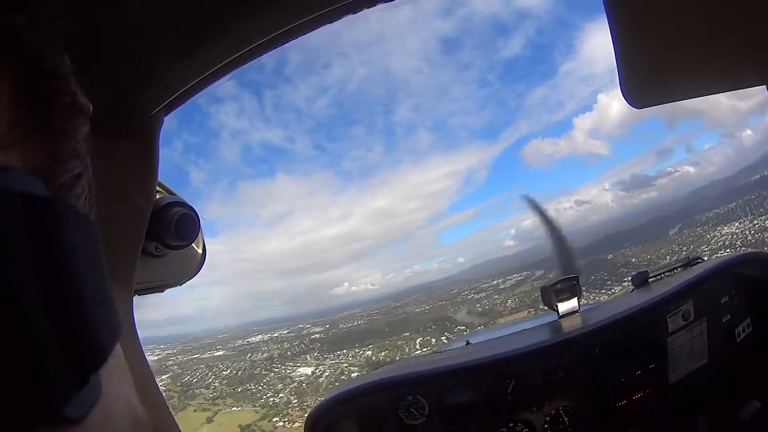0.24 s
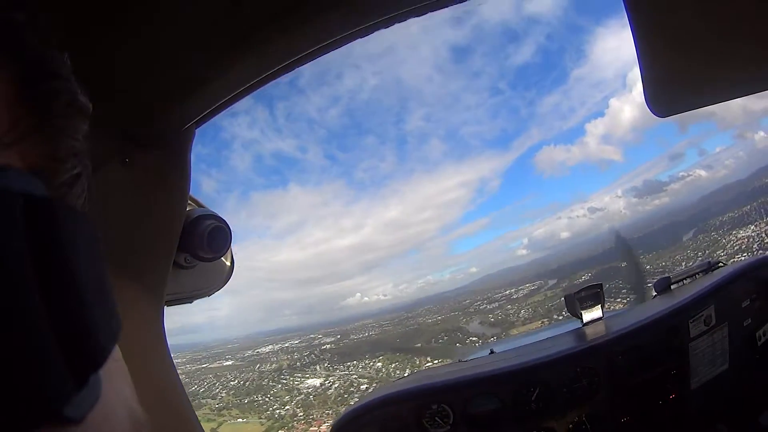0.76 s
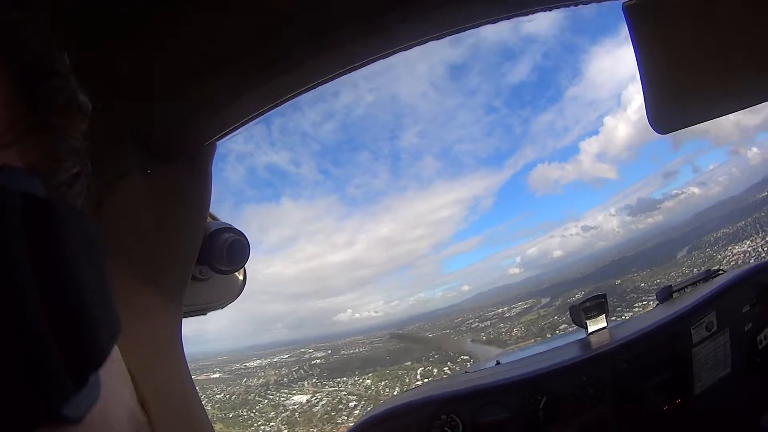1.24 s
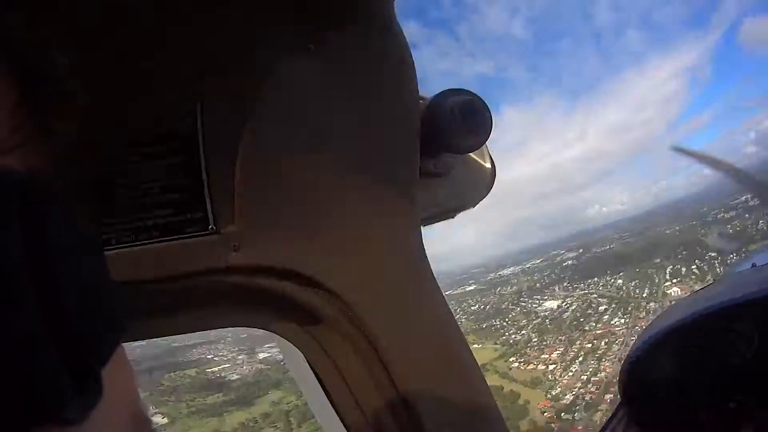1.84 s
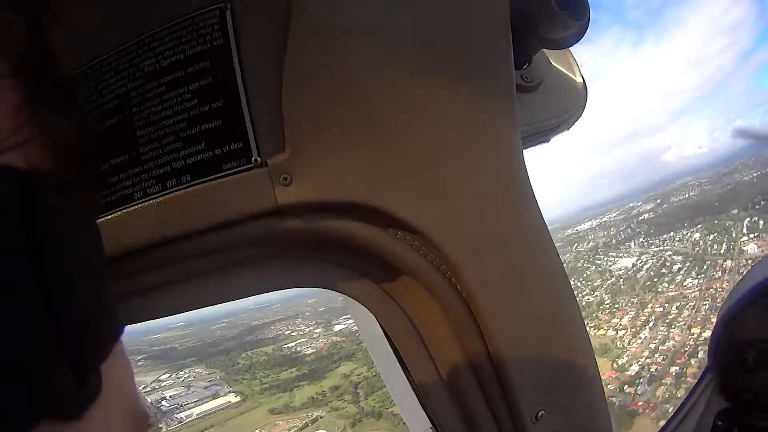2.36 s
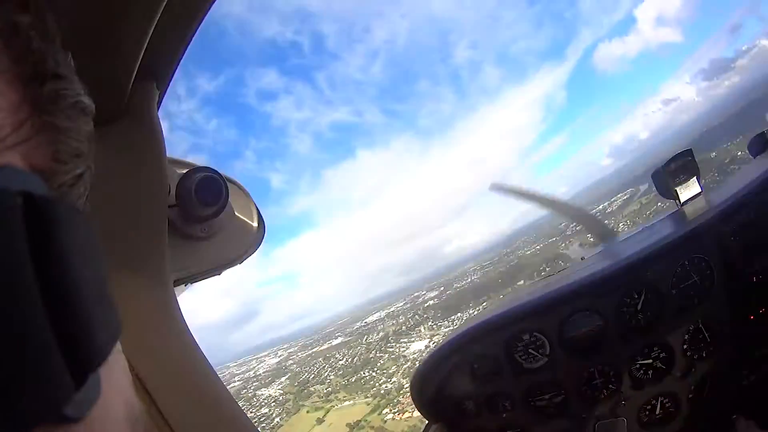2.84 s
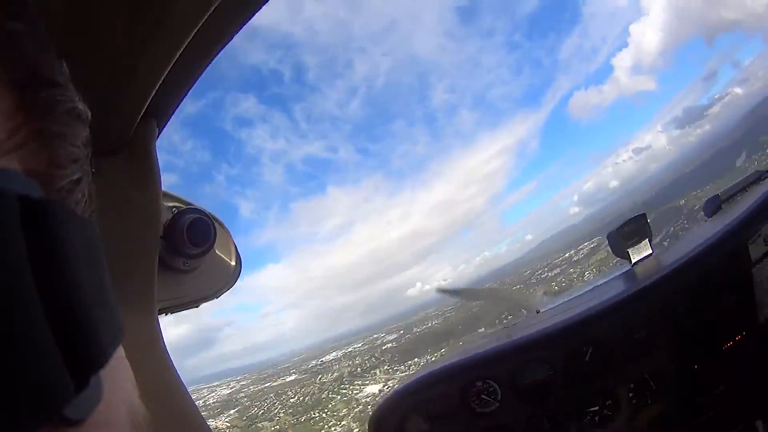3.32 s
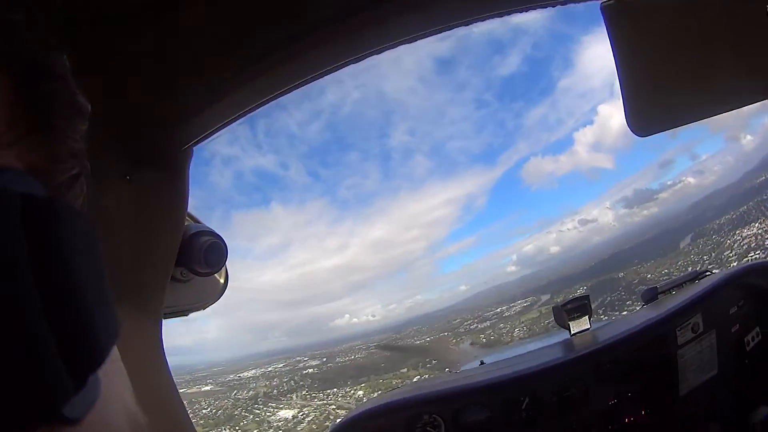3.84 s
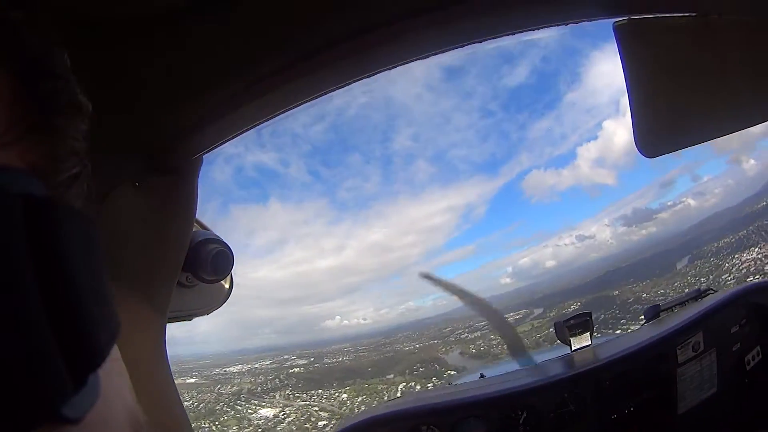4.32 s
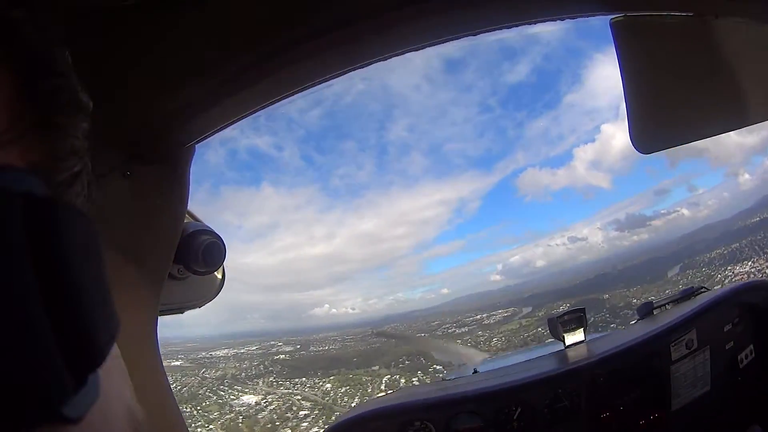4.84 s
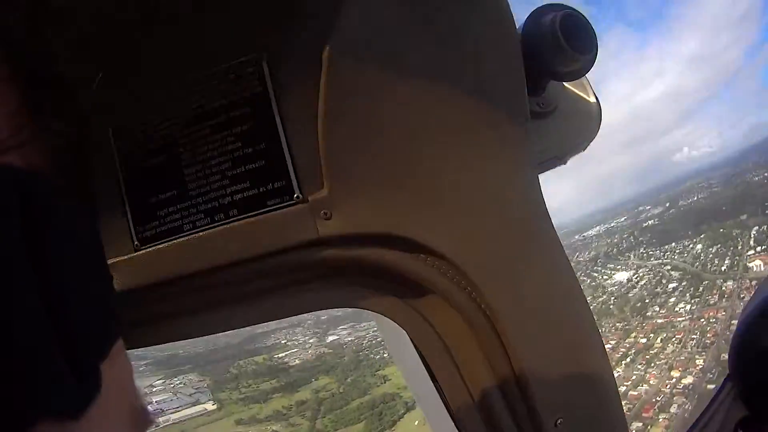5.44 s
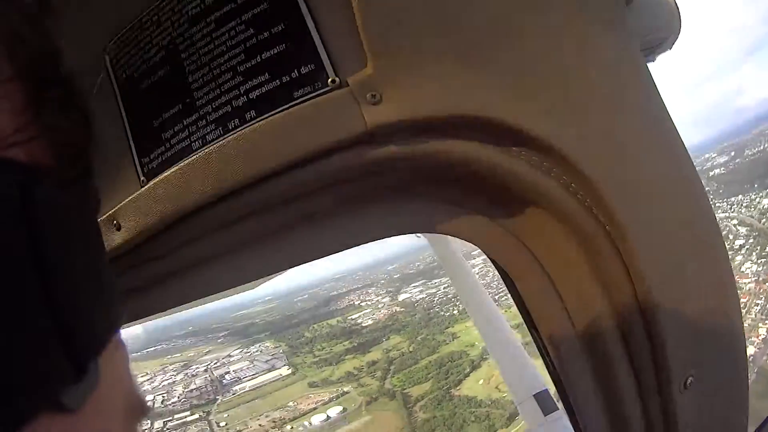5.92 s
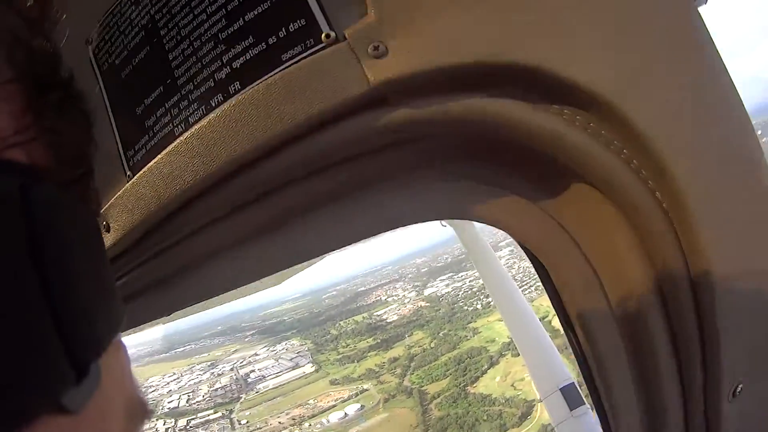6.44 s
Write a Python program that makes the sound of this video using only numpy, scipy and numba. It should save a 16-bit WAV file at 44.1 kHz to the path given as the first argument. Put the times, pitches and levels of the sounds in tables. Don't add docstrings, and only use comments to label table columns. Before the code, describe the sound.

A piercing high electrical whine over a low uneven buzz, with faint thin tones, hiss and soft periodic thumps, sagging slightly in pitch then partly recovering.

```python
import sys
import numpy as np
from scipy import signal
from scipy.fft import rfft, irfft, next_fast_len
from scipy.io import wavfile
from scipy.ndimage import uniform_filter1d
from numba import njit

SR = 44100
rng = np.random.default_rng(int(sys.argv[2]) if len(sys.argv) > 2 else 0)


def digitize_waveform(pressure):
    field = np.atleast_2d(pressure).T
    bounded = np.clip(field, -1, 1)
    quanta = np.round(bounded * 32767).astype(np.int16)
    wavfile.write(sys.argv[1], SR, quanta)


def convert_level_to_amplitude(level_db):
    exponent = np.asarray(level_db, float) / 20
    return 10 ** exponent


N = 294147

# time in seconds, ripple frequency in Hz.
ALTERNATOR_SPEED = [(0, 5065), (.45, 5052.5), (.7, 5055), (1.05, 5052), (1.6, 5052.5), (1.95, 5023),
                    (2.25, 5014), (2.55, 4967), (3.3, 4812), (3.5, 4799), (3.75, 4795), (4.1, 4760),
                    (4.5, 4746), (4.75, 4749), (5.63, 4724), (6.05, 4789), (6.4, 4818), (6.67, 4821)]
# multiple in sixths of the ripple, level in dB rms, lift at full load in dB.
RIPPLE_PARTIALS = [(1, -65.5, 2.5), (2, -60.5, 1.5), (4, -60.5, 1.5), (6, -35.5, 0.7), (8, -68, 2.3),
                   (12, -49, 1.1)]
# multiple of the firing, bus level in dB rms, lead in radians.
PULSE_HARMONICS = [(1, -43, 0.25), (2, -50, -0.25), (3, -55.5, 0.15), (4, -76.5, -0.14), (5, -65.5, -0.2),
                   (6, -59, -0.26), (7, -63, -0.026)]
# time in seconds, kick in dB.
STROBE_FLASHES = [
    (.3875, -31),
    (1.6015, -31),
    (2.8155, -34.5),
    (4.0295, -32.5),
    (5.2425, -38),
    (6.457, -32),
]
# start in seconds, stop in seconds, held level of the row-rate tone in dB.
DISPLAY_SCANS = [
    (1.02, 1.895, -55.5),
    (2.123, 5.3, -59),
]
# multiple of the frame rate, level in dB.
FRAME_BUSY_COMB = [(2, -2.5), (3, -7.5), (4, -6), (5, -6.5), (6, -5.5), (10, -17), (14, -15)]
# multiple of the frame rate, level in dB.
FRAME_STEADY_COMB = [(6, -70), (9, -73), (10, -72), (11, -77), (12, -76), (14, -77), (17, -81), (18, -72)]
# multiple of the dimmer rate, level in dB.
DIMMER_COMB = [(4, -68), (8, -58.5), (10, -71), (12, -59.5), (16, -61), (18, -77), (20, -64), (22, -79),
               (24, -67), (26, -80), (28, -71), (32, -74), (36, -78), (40, -81)]
# multiple of the inverter rate, level in dB.
INVERTER_COMB = [(1, -62.5), (2, -51.5), (3, -70.5), (4, -79.5)]
# multiple of the fan rate, level in dB.
FAN_COMB = [(1, -61), (2, -65)]
# frequency in Hz, level in dB per Hz.
SHARED_HISS = [(10, -84), (30, -78), (60, -84), (120, -79), (200, -82.5), (300, -86), (600, -87),
               (1000, -91), (2000, -95), (4000, -96), (12000, -96)]
# frequency in Hz, level in dB per Hz.
OWN_HISS = [(10, -85), (30, -90), (80, -95), (200, -97), (400, -94.8), (3000, -94.8), (12000, -95.5)]
# frequency in Hz, gain in dB.
LINE_COUPLING = [(10, -29), (40, -14), (60, 2.5), (78, 1.5), (105, 5.5), (140, -0.5), (200, 1.5), (400, 0)]
# frequency in Hz, gain in dB.
CONVERTER_EDGE = [(9300, -0.5), (9700, -2.5), (10100, -6.5), (10300, -10), (10450, -12.5), (10600, -34.5),
                  (11000, -74), (12000, -100.5)]
# first time in seconds, period in seconds, delay in turns.
CYCLING_LOADS = [
    (.175, 1.2252, .25),
    (.31, 1.2242, .25),
    (.517, 1.2315, .17),
    (.64, 1.233, .2),
    (.772, 1.232, .2),
    (1.007, 1.214, .25),
]
# time in seconds, delay in turns.
STRAY_DELAYS = [
    (2.072, .14),
    (2.956, .14),
    (3.312, .18),
    (4.113, .1),
    (4.541, .14),
    (5.338, .2),
    (5.991, .12),
]


def in_time(rows):
    s, *columns = np.transpose(rows)
    return [np.interp(np.arange(N) / SR, s, c) for c in columns]


def coloured(x, points):
    size = next_fast_len(N + 4096)
    hz, db = np.transpose(points)
    bins_hz = np.arange(size // 2 + 1) * SR / size
    gain = convert_level_to_amplitude(np.interp(np.log(bins_hz + 1), np.log(hz), db))
    return irfft(rfft(x, size) * gain, size)[..., :N]


def drift(rate_hz):
    r = np.exp(-80 * np.pi * rate_hz / SR)
    noise = rng.standard_normal(N // 40 + 4002)
    slow = signal.lfilter([1], [1, -2 * r, r * r], noise)[4000:]
    slow = (slow - slow.mean()) / slow.std()
    return np.interp(np.arange(N) / 40, np.arange(len(slow)), slow)


def fading(steps, rise_s, fall_s):
    up, down = np.exp(-1 / (rise_s * SR)), np.exp(-1 / (fall_s * SR))
    decaying = signal.lfilter([1], [1, -down], steps + 1e-18)
    return signal.lfilter([1 - up], [1, -up], decaying)


def impulses(seconds, values):
    clicks = np.zeros(N)
    clicks[(np.asarray(seconds) * SR).astype(int)] = values
    return clicks


def at_strobe(values):
    return impulses(np.array(STROBE_FLASHES)[:, 0], values)


def comb(turns, lines, wobble, scatter):
    waver = [1 + wobble * drift(5.6) for group in range(3)]
    total = np.zeros(N)
    for i, (k, db) in enumerate(lines):
        phase = 2 * np.pi * (round(k) * turns + scatter * rng.random())
        total += np.sqrt(2) * convert_level_to_amplitude(db) * waver[i % 3] * np.cos(phase)
    return total


def white_noise(channels):
    return rng.standard_normal((channels, N)) * np.sqrt(SR / 2)


def input_hiss():
    return coloured(white_noise(2), OWN_HISS)


def bus_hiss():
    return coloured(white_noise(1)[0], SHARED_HISS)


def fan(seconds):
    return comb(70.16 * seconds, FAN_COMB, wobble=.05, scatter=1)


def inverter(seconds):
    turns = 398.73 * seconds + 0.011 * drift(0.68)
    return comb(turns, INVERTER_COMB, wobble=0.029, scatter=1.0)


def dimmer(seconds):
    turns = 82.37 * seconds + 0.0081 * drift(0.33)
    odd_lines = [(k, -73.5 - .3 * max(k - 13, 0)) for k in range(3, 44, 2)]
    return comb(turns, [*DIMMER_COMB, *odd_lines], wobble=0.083, scatter=0.21)


def scan_levels():
    edge_s, surge_s, creep_s, warn_s = 0.045, .27, .4, .12
    row_idle_db, row_edge_db, frame_idle_db = -71.5, -62.5, -54.5
    row_db, frame_db = row_idle_db, frame_idle_db
    for on, off, db in DISPLAY_SCANS:
        rows, = in_time([
            (on - creep_s, row_idle_db), (on - edge_s, row_edge_db),
            (on + 2 * edge_s, -51.5),
            (on + surge_s, db), (off - creep_s, db),
            (off - warn_s, db + 3),
            (off - edge_s, db), (off + edge_s, row_edge_db), (off + creep_s, row_idle_db)])
        low = db - 9.5
        frames, = in_time([(on + edge_s, frame_idle_db), (on + surge_s + edge_s, low),
                           (off - creep_s, low), (off, frame_idle_db)])
        row_db, frame_db = np.maximum(row_db, rows), np.minimum(frame_db, frames)
    return row_db, frame_db


def display(seconds):
    row_db, frame_db = scan_levels()
    frame = 128.09 * seconds + 0.0058 * drift(0.63)
    rows = convert_level_to_amplitude(row_db) * comb(frame, [(8, -.3)], wobble=.02, scatter=1)
    octave_db = np.clip(row_db + 60, -11, 0)
    row_octave = convert_level_to_amplitude(octave_db) * comb(frame, [(16, -63.8)], wobble=.12, scatter=1)
    busy = convert_level_to_amplitude(frame_db) * comb(frame, FRAME_BUSY_COMB, wobble=0.062, scatter=1.0)
    steady = comb(frame, FRAME_STEADY_COMB, wobble=0.11, scatter=0.58)
    return rows + row_octave + busy + steady


def panel():
    seconds = np.arange(N) / SR
    return display(seconds) + dimmer(seconds) + inverter(seconds) + fan(seconds)


def strobe():
    kicks = at_strobe(convert_level_to_amplitude(np.array(STROBE_FLASHES)[:, 1]))
    dip = fading(kicks, rise_s=.0007, fall_s=.0012)
    return -2.4 * signal.sosfilt(signal.butter(2, 70, "high", fs=SR, output="sos"), dip)


def late_pulses():
    late = []
    for first, period, turns in CYCLING_LOADS:
        for k in range(6):
            s = first + k * period
            if s < N / SR:
                late.append((s, turns * (1 - .06 * s)))
    return np.transpose([*late, *STRAY_DELAYS])


@njit
def entrain(pushes, firing, resets, pull, restart):
    lead, out = 0.0, np.zeros(len(pushes))
    for i in range(len(pushes)):
        lead += pushes[i] - pull * np.sin(2 * np.pi * lead)
        if resets[i] > 0:
            lead += (restart - firing[i] - lead + .3) % 1 - .3
        out[i] = lead
    return out


def regulator(ripple_turns):
    firing = .016182 * ripple_turns - .12
    seconds, delay = late_pulses()
    stalls = uniform_filter1d(impulses(seconds, -delay), size=130)
    stalls = 1.15 * stalls - .3 * np.roll(stalls, 600)
    lead = entrain(stalls, firing, at_strobe(1.0), 1.3 / SR, .58)
    lead = uniform_filter1d(lead, size=90) + .022 * drift(60) + .025 * drift(2.8)
    return 2 * np.pi * firing, 2 * np.pi * lead


def hum(fired):
    pulse = np.zeros(N)
    for k, db, lead in PULSE_HARMONICS:
        pulse += np.sqrt(2) * convert_level_to_amplitude(db) * np.cos(round(k) * fired + lead)
    return pulse * convert_level_to_amplitude(0.6 * drift(38))


def pulse_bend(ripple_hz):
    slow_hz, fast_hz = 4800, 5060
    weakest_s, strobe_period_s = .27, 1.214
    fast = np.clip((ripple_hz - slow_hz) / (fast_hz - slow_hz), 0, 1)
    cycle = np.cos(2 * np.pi * (np.arange(N) / SR - weakest_s) / strobe_period_s)
    swing = 0.065 * cycle * (1.3 + .5 * cycle)
    return 0.52 - fast * (0.19 + swing)


def whine(ripple_hz, ripple_turns, bend, fired):
    pulley = 2 * np.pi * .006595 * ripple_turns
    rocked = 0.18 * np.sin(pulley) + .07 * np.sin(2 * pulley + 0.83)
    rocked += 0.055 * drift(33) + 0.068 * drift(150) + .35 * drift(2.8)
    ahead = 2.55 - .0021 * (5050 - ripple_hz)
    bent = bend * np.cos(fired + ahead) + .07 * np.cos(2 * fired + 2.4) + .027 * np.cos(3 * fired + 2.8)
    phase = 2 * np.pi * ripple_turns + bent + rocked
    swell = 1 + .088 * np.cos(fired - 1.2) + .037 * np.cos(2 * fired - .6) + .015 * np.cos(3 * fired - .4)
    swell = swell + 0.0052 * drift(25)
    load = fading(at_strobe(1.0), rise_s=0.0086, fall_s=.6) + 0.29 * drift(4.4)
    total = np.zeros(N)
    for k, db, load_db in RIPPLE_PARTIALS:
        total += np.sqrt(2) * convert_level_to_amplitude(db + load_db * load) * swell * np.cos(round(k) * phase / 6)
    return total


def scene():
    inertia_s = .1
    ripple_hz = uniform_filter1d(in_time(ALTERNATOR_SPEED)[0], size=int(inertia_s * SR))
    ripple_turns = np.cumsum(ripple_hz) / SR
    firing, lead = regulator(ripple_turns)
    field = firing + uniform_filter1d(lead, size=400)
    kicks_and_hum = coloured(strobe() + hum(firing + lead), LINE_COUPLING)
    bus = bus_hiss() + panel() + kicks_and_hum
    bus = bus + whine(ripple_hz, ripple_turns, pulse_bend(ripple_hz), field)
    return bus + input_hiss()


def low_pass(x):
    return signal.sosfilt(signal.butter(12, 11590, fs=SR, output="sos"), x)


def record(dry):
    balance = convert_level_to_amplitude(-.1 * np.array([[1], [-1]]))
    mix = coloured(dry, CONVERTER_EDGE) * balance - .0017
    return low_pass(mix)


dry = scene()
out = record(dry)
digitize_waveform(out)
```